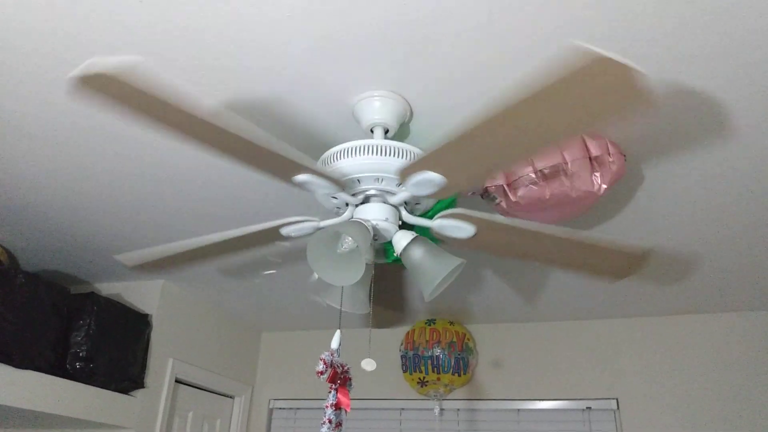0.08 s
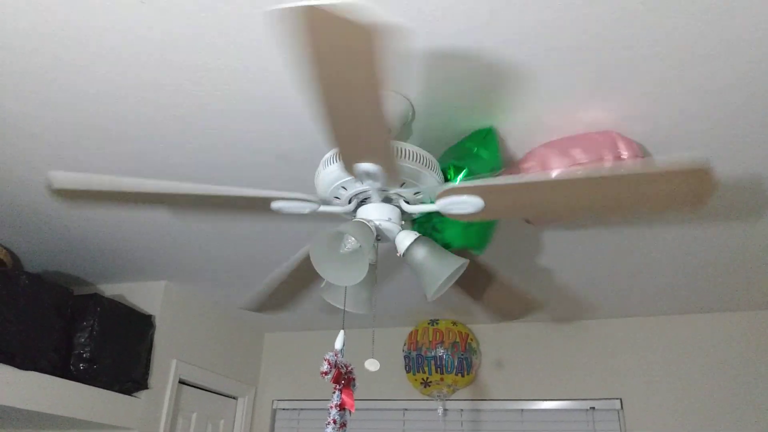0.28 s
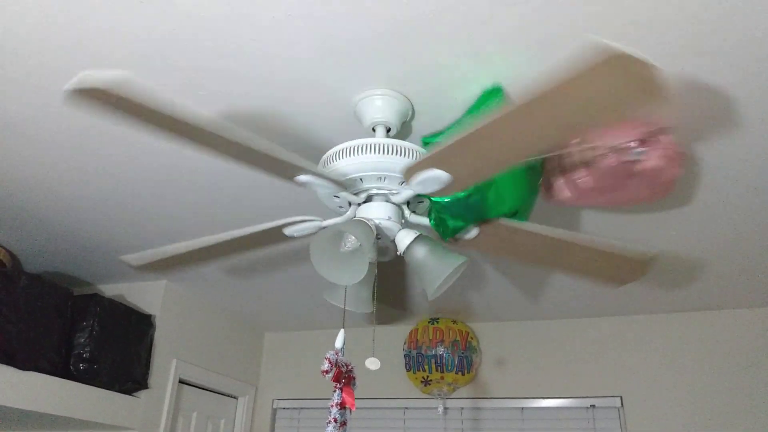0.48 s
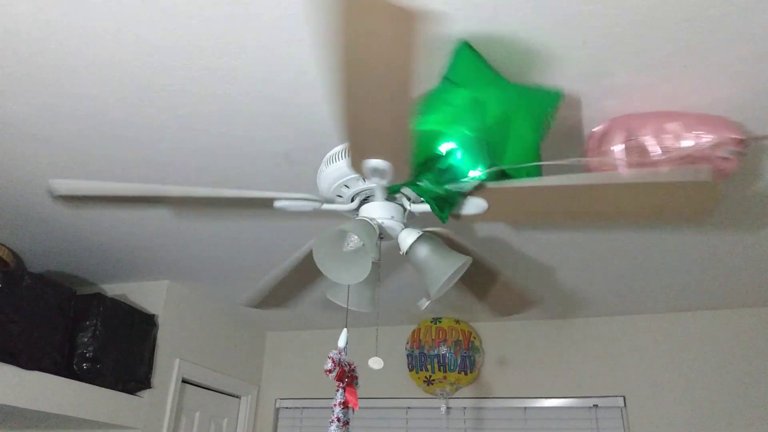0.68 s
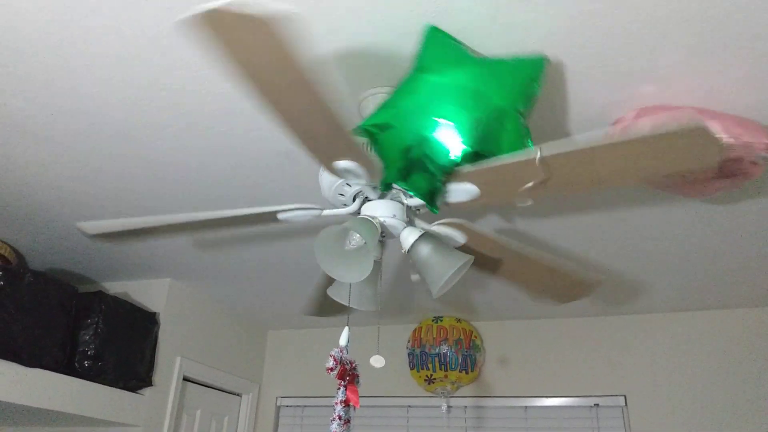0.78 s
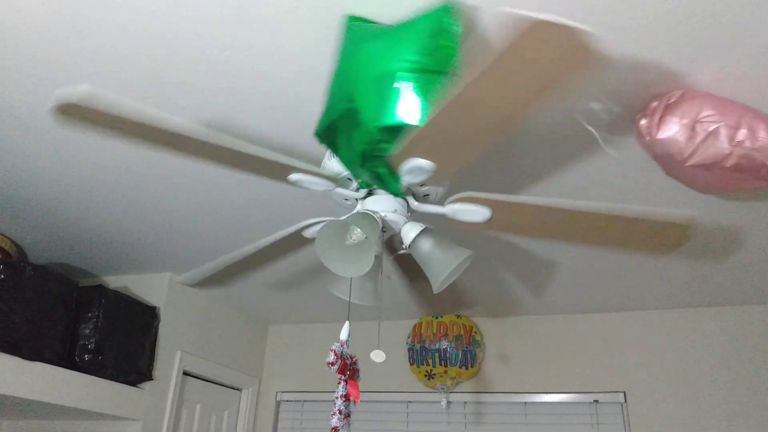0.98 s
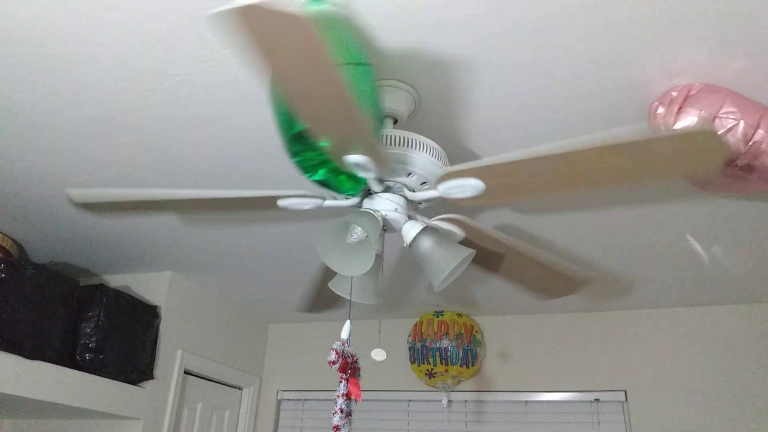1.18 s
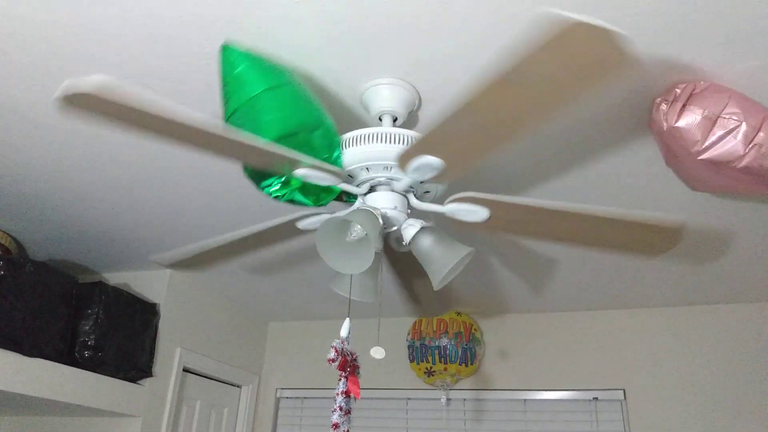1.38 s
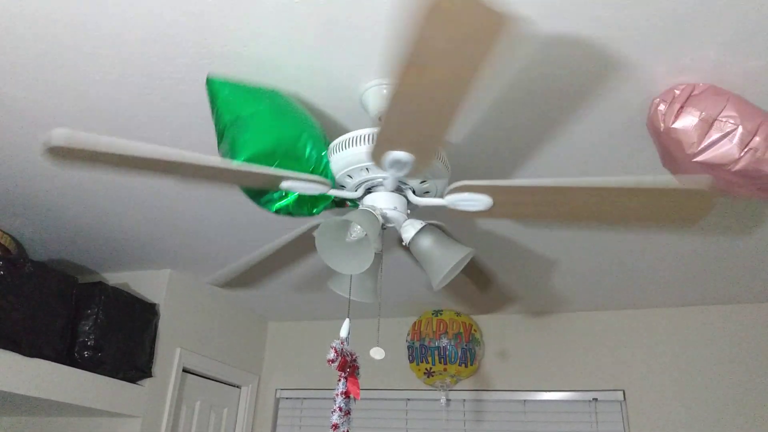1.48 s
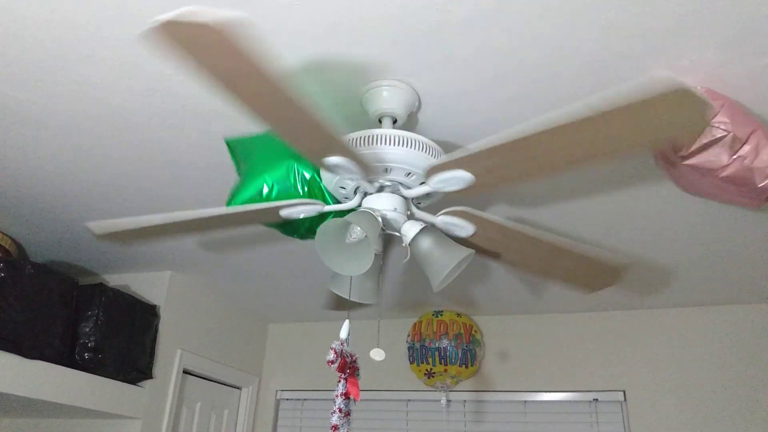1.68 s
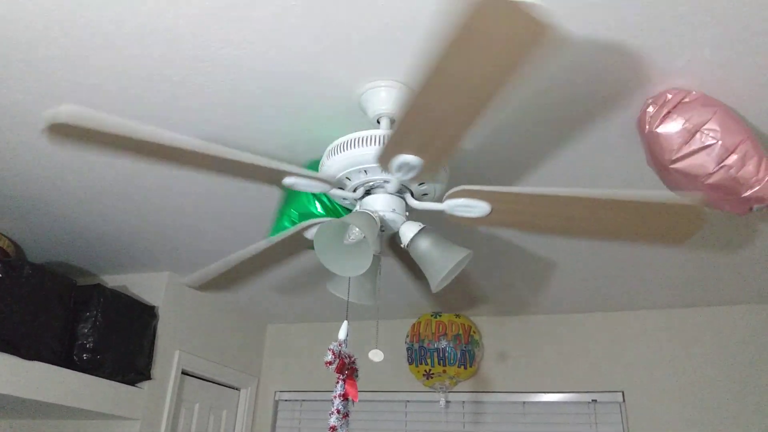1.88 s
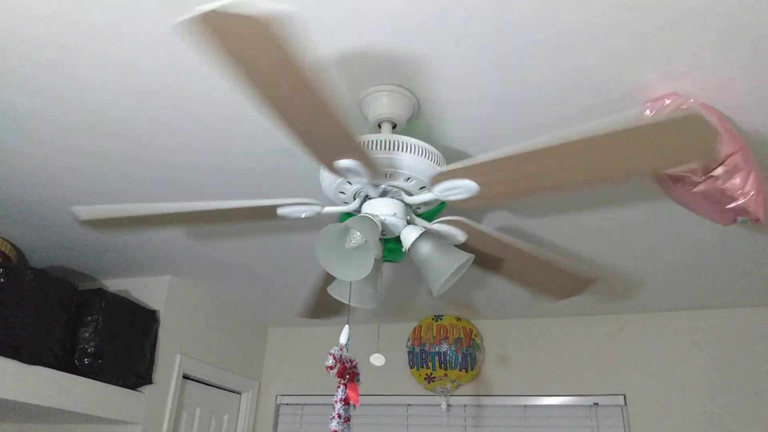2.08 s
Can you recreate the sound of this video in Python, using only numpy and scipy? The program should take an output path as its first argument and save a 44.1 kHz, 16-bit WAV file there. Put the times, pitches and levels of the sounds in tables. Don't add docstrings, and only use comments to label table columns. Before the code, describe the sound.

Foil crinkling in a room: quiet hum and soft taps first, a sudden burst of crisp snaps, crackle and low booming thuds from fan blades, then quick fading to faint bumps and rustle, thinned by a phone's noise suppression.

```python
import sys
import numpy as np
from scipy import signal
from scipy.io import wavfile
from scipy.ndimage import uniform_filter1d

SR = 44100
rng = np.random.default_rng(int(sys.argv[2]) if len(sys.argv) > 2 else 0)


def unload_wav(signal):
    wavfile.write(
        sys.argv[1],
        SR,
        np.round(np.clip(np.atleast_2d(signal).T, -1, 1) * 32767).astype(np.int16),
    )


def elevation(decibels):
    levels = np.asarray(decibels, float)
    return 10 ** (levels / 20)


N = 92610
TIME_S = np.arange(N) / SR
SIDES = np.array([[1], [-1]])
GRIP_S, REGRIP_S = 0.227, 2.018

# t/s, level/dB, boom relative to rustle/dB
CONTACT = [(0.0, -61, -4), (0.2, -61, -11), (0.2, -60, -14), (0.24, -47, -4.5), (0.38, -50, -8.5),
           (0.45, -44, -10.5), (0.55, -38, -27), (0.58, -37.5, -10), (0.7, -50, -7), (0.75, -45, -17),
           (0.85, -47, -3.5), (1.06, -49.5, -8.5), (1.32, -58.5, 11), (1.56, -65, 4.5), (1.72, -65.5, 6),
           (1.94, -71, 3), (2.05, -62.5, 6), (2.1, -64, -11)]
# f/Hz, level/dB
RUSTLE_SPECTRUM = [(290, 0), (500, -2.5), (718, -4), (3060, -6.5), (4280, -4), (5800, -5.5), (8960, -1),
                   (15100, -7.5), (16000, -2)]
# f/Hz, level/dB
BOOM_SPECTRUM = [(29, -33), (60, -35), (168, -2), (285, 9.5), (715, -2.5), (1100, 3.5), (1350, 3),
                 (1980, -33)]
# f/Hz, level/dB
FAINT_SPECTRUM = [(350, -46), (700, -43), (1490, -10.5), (2300, -1), (3200, -18.5), (4220, -11.5),
                  (6200, -13), (8860, 4.5), (16000, -17)]
# f/Hz, correlation/1
LIKENESS = [(60, -3.5), (180, 1), (550, 0.61), (1650, 0.064), (4970, 0.19), (15000, -0.065)]
# f/Hz, left over right/dB
RUSTLE_PAN = [(60, 3), (180, 4), (550, -0.5), (1650, 0), (4970, -1), (15000, -3.5)]
# f/Hz, left over right/dB
FAINT_PAN = [(60, 1.0), (180, 31), (550, -23.5), (1650, 4), (4970, -20.5), (15000, -12.5)]
# t/s, peak level/dB
BUMPS = [(0.06, -62), (0.132, -64), (1.592, -66), (1.668, -56.5), (1.702, -59), (1.719, -59), (1.755, -59),
         (1.772, -59), (1.799, -68), (1.815, -62), (1.87, -63.5), (2.023, -62.5), (2.048, -59.5)]
# f/Hz, level/dB, T60/s
CUSHION_MODES = [
    (357.3, 8.5, 0.12),
    (388, -15, 0.1),
    (320, -13, 0.068),
    (465, -14, 0.19),
]
# t/s, peak level/dB, f/Hz
SNAPS = [(0.207, -36, 8050), (0.2275, -27, 9430), (0.231, -43, 10300), (0.2358, -29, 9200),
         (0.2452, -21.5, 8600), (0.2494, -30, 8800), (0.2594, -27.5, 8970), (0.265, -25.5, 8800),
         (0.3, -26, 9300), (0.356, -33, 9390), (0.471, -30, 9040), (0.7383, -22, 10300),
         (0.75, -24.5, 9800), (0.77, -24, 9600), (1.9724, -49, 8720)]
# t/s, peak level/dB
THUDS = [(0.211, -58), (0.287, -51), (0.349, -70), (0.429, -41.5), (0.459, -44), (0.499, -42), (0.551, -35),
         (0.599, -60), (0.659, -47), (0.718, -43), (0.809, -51), (0.879, -76), (0.949, -67)]
# t/s,
# width/s, level/dB, f/Hz, spread as frequency ratio/1
SWIPES = [(0.57, 0.041, -34.5, 8750, 1.2), (0.512, 0.0078, -41, 8600, 1.11),
          (0.498, 0.013, -44.5, 4300, 1.03), (0.59, 0.014, -50, 4700, 0.98),
          (0.595, 0.033, -49.5, 750, 1.195), (0.37, 0.049, -55.5, 2440, 1.11),
          (1.08, 0.032, -50, 8800, 1.44), (0.265, 0.0045, -50.5, 3500, 1.2),
          (0.217, 0.007, -56.5, 2120, 1.07), (0.2185, 0.0057, -63, 510, 1.4),
          (1.738, 0.043, -74.5, 3300, 1.41), (1.98, 0.0084, -62.5, 8070, 1.05)]
# start t/s, end t/s, level/dB, f/Hz
WHINES = [
    (0.91, 1.17, -58.5, 1330),
    (1.3, 1.66, -70, 1432),
    (1.7, 3, -86, 1440),
    (1.68, 1.8, -76.5, 2100),
]
# f/Hz, half width/Hz, threshold raised/dB
WEAK_BANDS = [(1750, 70, 10), (2780, 50, 10), (3050, 60, 18), (3420, 110, 23), (3950, 60, 13),
              (4750, 70, 12), (5800, 60, 12), (6330, 70, 13)]
GATE_DB = [
    [[-97]],
    [[-102]],
]


def rms_one(x):
    return x / np.sqrt(np.mean(x ** 2) + 1e-20)


def noise():
    return rng.standard_normal((2, N))


def bandpass(x, order, low_hz, high_hz):
    return signal.sosfilt(signal.butter(order, [low_hz, high_hz], "band", fs=SR, output="sos"), x)


def at_hz(points, hz):
    table = np.array(points)
    return np.interp(np.log(hz), np.log(table[:, 0]), table[:, 1])


def drift(rate_hz):
    r = np.exp(-80 * np.pi * rate_hz / SR)
    slow = signal.lfilter([1], [1, -2 * r, r * r], rng.standard_normal(N // 40 + 2002))
    slow = slow[2000:]
    return np.interp(np.arange(N) / 40, np.arange(len(slow)), rms_one(slow))


def ring(drive, hz, t60):
    r, w = elevation(-60 / (t60 * SR)), 2 * np.pi * hz / SR
    return signal.lfilter([0, np.sin(w)], [1, -2 * r * np.cos(w), r * r], drive + 1e-18)


def resonant_noise(hz, t60):
    return rms_one(ring(ring(noise(), hz, t60), hz, t60))


def train(rows):
    out = np.zeros(N)
    for s, db in rows:
        out[int(s * SR)] += elevation(db)
    return out


def coloured(source, spectrum, pan, patchy_db, patch_hz):
    out, together = 0, drift(patch_hz)
    top = spectrum[-1][0]
    edges = spectrum[0][0] * 2 ** np.arange(0, 9, 1 / 3)
    edges = np.append(edges[edges < 0.93 * top], top)
    for k, (low, high) in enumerate(zip(edges, edges[1:])):
        mid, side = bandpass(source[k % 2], 2, low, high)
        hz = np.sqrt(low * high)
        alike = np.clip(at_hz(LIKENESS, hz), -0.99, 0.99)
        gain = elevation(at_hz(spectrum, hz) + patchy_db * (0.26 * together + drift(patch_hz)))
        balance = elevation(at_hz(pan, hz) / 2 * SIDES)
        stereo = np.sqrt(1 + alike) * mid + np.sqrt(1 - alike) * side * SIDES
        out = out + gain * balance * stereo
    return out / np.sqrt(np.mean(out.mean(axis=0) ** 2))


def crackle():
    creases_per_s, spread_db, crease_share = 5000, 1.55, 0.38
    sizes = elevation(spread_db * np.minimum(rng.exponential(1, N), 5))
    born = rng.random(N) < creases_per_s * elevation(3.0 * drift(40)) / SR
    creases = rms_one(sizes * born * rng.standard_normal((2, 2, N)))
    echoes = rng.standard_normal((2, 2, N))
    return np.sqrt(crease_share) * creases + np.sqrt(1 - crease_share) * echoes


def faint_rustle(level_db):
    top_db = np.where(TIME_S < GRIP_S, -60, -50)
    faint_db = np.minimum(level_db, top_db) - 0.72 + 0.6 * drift(9.6)
    return elevation(faint_db) * coloured(crackle(), FAINT_SPECTRUM, FAINT_PAN, patchy_db=0.8, patch_hz=3.3)


def rustle(pressed_db):
    slack_db = -2 * (TIME_S < REGRIP_S) * (TIME_S > REGRIP_S - 0.2)
    foil = coloured(crackle(), RUSTLE_SPECTRUM, RUSTLE_PAN, patchy_db=1.27, patch_hz=16)
    foil = elevation(pressed_db + slack_db + 0.5) * foil
    dull = signal.sosfiltfilt(signal.butter(2, 2600, fs=SR, output="sos"), foil)
    return dull + elevation(-8 * (TIME_S < GRIP_S)) * (foil - dull)


def boom(pressed_db, boom_db):
    white = rng.standard_normal((2, 2, N))
    gas = coloured(white, BOOM_SPECTRUM, RUSTLE_PAN, patchy_db=3.5, patch_hz=51.0)
    return elevation(pressed_db + boom_db - 4.5) * gas


def hum():
    mid, side = bandpass(noise(), 6, 271.5, 475) * elevation(2.2 * drift(1.5))
    return elevation(-72) * rms_one(mid + 0.54 * side * SIDES)


def rumble():
    return elevation(-96.5) * rms_one(bandpass(noise(), 2, 25, 160))


def undertone():
    return elevation(-93) * resonant_noise(858, 0.066) * elevation([[-3.0], [2.5]])


def bumps():
    soft = bandpass(train(BUMPS), 3, 240, 633)
    return elevation(-8) * sum(elevation(db) * ring(soft, hz, t60) for hz, db, t60 in CUSHION_MODES)


def snaps():
    t60_s, pan_db, size = 0.028, -9, SR // 20
    out = np.zeros((2, N + SR))
    decay = elevation(-60 * np.arange(size) / SR / t60_s)
    for s, db, hz in SNAPS:
        i = int(s * SR)
        burst = bandpass(decay * rng.standard_normal((2, size)), 3, hz / 1.3, hz * 1.25)
        out[:, i:i + size] += elevation(db - 7 + pan_db / 2 * SIDES) * burst
    return out[:, :N]


def thuds():
    rise_s, low_hz = 0.028, 88
    t = np.arange(SR // 4) / SR / rise_s
    shape = signal.fftconvolve(train(THUDS), t * np.exp(1 - t))[:N]
    mid, side = rms_one(bandpass(noise(), 3, low_hz * 1.03, low_hz * 3.88))
    return elevation(-18) * shape * (mid + 0.17 * side * SIDES)


def swipes():
    foil, out = crackle()[0], 0
    for s, width, db, hz, spread in SWIPES:
        ratio = max(spread, 1.02)
        swell = np.exp(-0.5 * ((TIME_S - s) / width) ** 2)
        out = out + elevation(db) * swell * rms_one(bandpass(foil, 2, hz / ratio, hz * ratio))
    return out * elevation([[-3.5], [3.0]])


def whine():
    t60_s, fade_db, edge_s = 0.014, 8.5, 0.03
    out = 0
    for a, b, db, hz in WHINES:
        fade = elevation(db - fade_db * np.clip((TIME_S - a) / (b - a), 0, 1))
        edges = np.clip(np.minimum(TIME_S - a, b - TIME_S) / edge_s + 0.5, 0, 1)
        out = out + fade * edges * resonant_noise(hz, t60_s)
    return out * elevation([[-3.0], [2.5]])


def tick():
    start_s, hz, t60_s = 1.645, 3700, 0.12
    decay = elevation(-60 * np.maximum(TIME_S - start_s, 0) / t60_s) * (TIME_S > start_s)
    return elevation(-51) * bandpass(decay * noise(), 2, hz / 1.1, hz * 1.15) * elevation([[-3.5], [3.0]])


def regrip():
    foil = rms_one(bandpass(crackle()[0], 2, 1100, 6300))
    return elevation(-69) * (TIME_S > REGRIP_S) * foil * elevation([[-4.0], [2.5]])


def scene():
    knee_db, slope = -53, 2.6
    s, level, boom_level = np.transpose(CONTACT)
    level_db, boom_db = np.interp(TIME_S, s, level), np.interp(TIME_S, s, boom_level)
    pressed_db = level_db - slope * np.maximum(knee_db - level_db, 0)
    steady = faint_rustle(level_db) + hum() + rumble() + undertone()
    gripped = rustle(pressed_db) + boom(pressed_db, boom_db)
    events = bumps() + snaps() + thuds() + swipes() + whine() + tick() + regrip()
    return steady + gripped + events


def strips(shape, size):
    field = rng.standard_normal((2, shape[1] // 3 + 1, shape[2]))
    field = np.repeat(field, 3, axis=1)[:, :shape[1]]
    return rms_one(uniform_filter1d(field, size=size, axis=2))


def below(x):
    return 1 / (1 + np.exp(np.clip(x, -30, 30)))


def suppress(x):
    gate_above_hz, knee_db, depth_db, scatter_db = 1600, 1.0, 30, 5
    fill_under_db, hole_db, floor_db, cutoff_hz = 13.0, -22, -80, 15830
    frame = dict(fs=SR, nperseg=1024, noverlap=768)
    hz, _, bins = signal.stft(x, **frame)
    hiss = signal.stft(elevation(floor_db) * rng.standard_normal(x.shape), **frame)[2]
    bins = bins * elevation(-2 * np.exp(-0.5 * ((hz - 3110) / 220) ** 2))[:, None]
    power = uniform_filter1d(np.abs(bins) ** 2, size=5, axis=1)
    power = uniform_filter1d(power, size=7, axis=2)

    weak_db = sum(db * (np.abs(hz - at) < half) for at, half, db in WEAK_BANDS)[:, None]
    waver = 1 + 0.45 * strips(bins.shape, size=25).sum(axis=0)
    weak_db = weak_db * np.clip(waver, 0, 1.3)
    over_db = 10 * np.log10(power + 1e-20) - GATE_DB - weak_db
    over_db = over_db - scatter_db * strips(bins.shape, size=60)

    gated = (hz > gate_above_hz)[:, None]
    shut = gated * below(over_db / knee_db)
    holes = gated * (over_db > -fill_under_db) * (strips(bins.shape, size=8) > -0.3)
    fill = hiss * elevation(hole_db * holes - weak_db) * np.clip(hz / 400, 0.25, 1)[:, None]
    out = bins * elevation(-depth_db * shut) + fill

    quiet = (hz > gate_above_hz / 3)[:, None] * below((over_db - 14) / 4)
    out = out * elevation(4.5 * quiet * strips(bins.shape, size=40).mean(axis=0))
    return signal.istft(out * (hz < cutoff_hz)[:, None], **frame)[1][:, :N]


def top_cut(x):
    return signal.sosfilt(signal.butter(12, 15830, fs=SR, output="sos"), x)


def record(dry):
    mix = suppress(dry)
    return top_cut(mix)


dry = scene()
out = record(dry)
unload_wav(out)
```